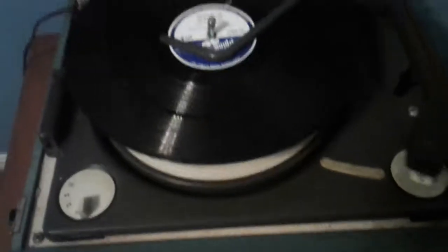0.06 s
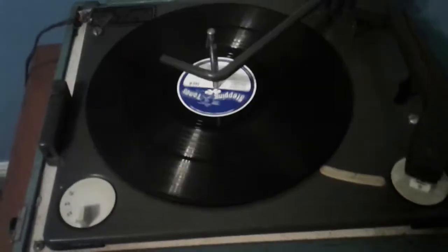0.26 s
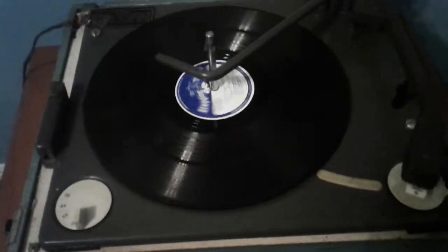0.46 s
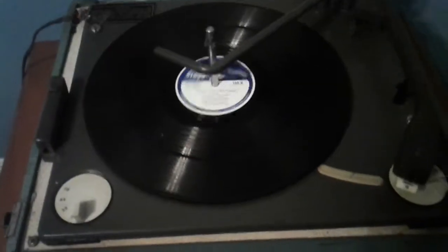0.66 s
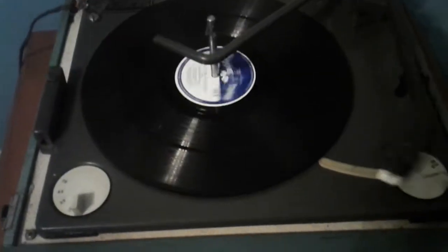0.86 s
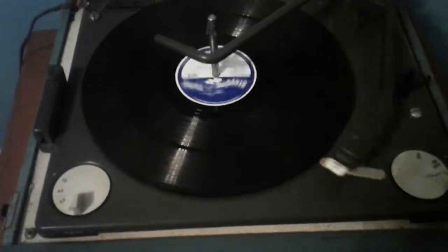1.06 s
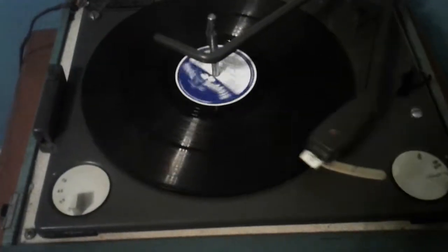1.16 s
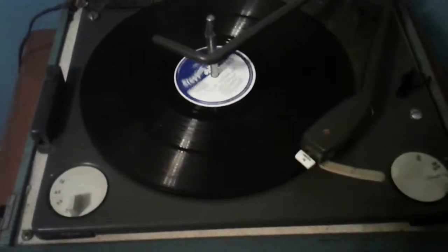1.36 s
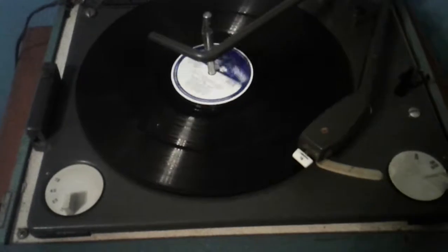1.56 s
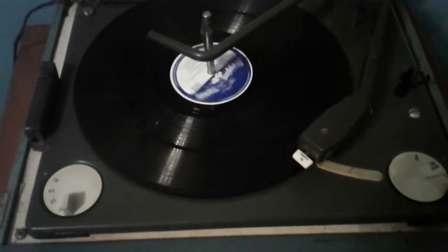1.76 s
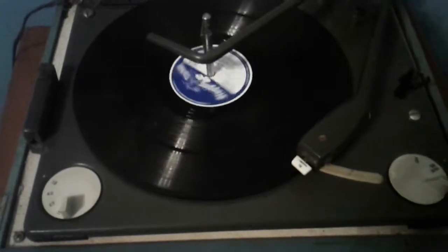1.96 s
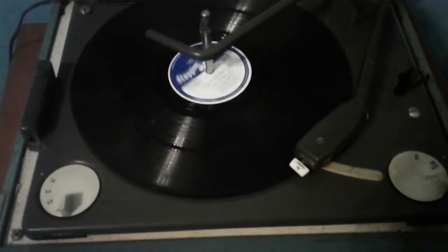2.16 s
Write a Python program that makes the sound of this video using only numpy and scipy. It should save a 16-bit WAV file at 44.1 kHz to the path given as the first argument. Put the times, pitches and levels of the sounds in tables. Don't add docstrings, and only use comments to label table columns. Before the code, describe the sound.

An old record changer drops a disc with a loud clack, then hums, ticks and clicks

```python
import sys
import numpy as np
from scipy import signal
from scipy.fft import rfft, irfft
from scipy.io import wavfile

SR = 44100
rng = np.random.default_rng(int(sys.argv[2]) if len(sys.argv) > 2 else 0)


def materialize(psi):
    bounded = np.clip(np.atleast_2d(psi).T, -1, 1)
    quanta = np.round(bounded * 32767).astype(np.int16)
    wavfile.write(sys.argv[1], SR, quanta)


def natural_amplitude(level_db):
    exponent = np.asarray(level_db, float) / 20
    return 10 ** exponent


N = 97020


def rms_one(x):
    return x / np.sqrt(np.mean(x ** 2) + 1e-20)


def noise():
    return rng.standard_normal(N)


def at_hz(points, hz):
    points = np.array(points, float)
    return np.interp(np.log(np.maximum(hz, 1)), np.log(points[:, 0]), points[:, 1])


def colour(x, spectrum):
    hz = np.arange(len(x) // 2 + 1) * SR / len(x)
    gain = natural_amplitude(at_hz(spectrum, hz)) * (hz > 0.7 * spectrum[0][0])
    return rms_one(irfft(rfft(x) * gain, len(x)))


def band(x, low_hz, high_hz):
    edges_hz = [low_hz, min(high_hz, 0.45 * SR)]
    return signal.sosfilt(signal.butter(2, edges_hz, "band", fs=SR, output="sos"), x)


def drift(rate_hz):
    r = np.exp(-2 * np.pi * rate_hz / SR)
    wander = signal.lfilter([1], [1, -2 * r, r * r], rng.standard_normal(N + SR))
    return rms_one(wander[SR:])


def since(start_s):
    return np.maximum(np.arange(N) / SR - start_s, 0)


def decay(seconds, t60_s):
    return natural_amplitude(-60 * seconds / t60_s)


def strike(times_s, levels_db, modes, tilt_db, spread_db, together_hz=0):
    out = np.zeros(N)
    luck_db = spread_db * rng.standard_normal((len(times_s), len(modes)))
    for k, (hz, mode_db, t60_s) in enumerate(modes):
        level_db = levels_db + mode_db + luck_db[:, k] + tilt_db * (hz > 1500)
        sign = (-1) ** (k * (hz > together_hz))
        clicks = np.full(N, 1e-18)
        clicks[(times_s * SR).astype(int)] = natural_amplitude(level_db) * sign
        r, w = decay(1 / SR, t60_s), 2 * np.pi * hz / SR
        out += signal.lfilter([0, np.sin(w)], [1, -2 * r * np.cos(w), r * r], clicks)
    return out


def air():
    # frequency_hz, level_db
    air_spectrum = [(88, -59), (150, -12), (230, -11.5), (861, -19), (1060, -20.5), (1600, -27),
                    (2490, -29.5), (3690, -36.5), (9000, -52), (11700, -65), (19800, -120)]
    return natural_amplitude(-63 + 0.7 * drift(21)) * colour(noise(), air_spectrum)


def room(x):
    # frequency_hz, t60_s
    reverb_times = [(200, 0.14), (1000, 0.25), (4000, 0.31), (12000, 0.33)]
    room_db, gap_s = -6.5, 0.0075
    late_db, late_longer, late_top_hz = -26, 3.95, 6000
    t = np.arange(SR) / SR
    white = rng.standard_normal((2, SR))
    tail = np.zeros(SR)
    for k, hz in enumerate(150 * 2 ** np.arange(0, 7, 0.5)):
        fall_db = -60 * t / at_hz(reverb_times, hz)
        late = natural_amplitude(late_db + fall_db / late_longer) * (hz < late_top_hz)
        echoes = band(white[k % 2], hz, np.sqrt(2) * hz)
        tail += echoes * (natural_amplitude(fall_db) + late) * (t > gap_s)
    return natural_amplitude(room_db) * signal.fftconvolve(x, tail / np.sqrt(np.sum(tail ** 2)))[:N]


def motor():
    # frequency_hz, level_db (rms)
    hum_lines = [(119.5, -54.5), (318, -72.5), (597, -89.5)]
    t = np.arange(N) / SR
    out = natural_amplitude(-61) * rms_one(band(noise(), 47.6, 95))
    for hz, db in hum_lines:
        out += np.sqrt(2) * natural_amplitude(db + 2.5 * drift(3.5)) * np.sin(2 * np.pi * hz * t)
    return out


def gear():
    # start_s, peak_db
    teeth = [(0.1407, -45), (0.508, -57.5), (0.5476, -58.5), (0.6746, -55.5), (0.8593, -50.5),
             (0.9542, -63), (0.9886, -63), (1.1135, -60.5), (1.1482, -62), (1.1936, -58), (1.2398, -56),
             (1.275, -59.5), (1.3186, -61), (1.3628, -58.5), (1.3956, -64), (1.482, -58.5), (1.559, -58.5),
             (1.6033, -62.5), (1.6368, -58), (1.7674, -48.5), (1.872, -61.5), (1.9122, -56.5),
             (2.0655, -56), (2.111, -50), (2.146, -48.5)]
    # frequency_hz, level_db, t60_s
    gear_modes = [(1082, -0.5, 0.05), (1255, 6.5, 0.005), (2235, -11, 0.034), (360, -4.5, 0.077)]
    rub_s = 0.0014
    times_s, levels_db = np.transpose(teeth)
    swell = np.zeros(N)
    for start_s in times_s:
        next_s = np.min(times_s[times_s > start_s], initial=N)
        u = since(start_s)
        swell += (u / rub_s).clip(0, 1) * (u < next_s - start_s)
    return swell * strike(times_s, levels_db + 4.5, gear_modes, 0, 1)


def grip():
    # time_s, level_db
    grip_levels = [(0.0, -53.5), (0.1, -43), (0.19, -58), (0.26, -38.5), (0.38, -48.5), (0.47, -48.5),
                   (0.73, -50), (0.88, -53.5), (1.08, -58), (1.4, -59.5), (1.54, -61.5), (2.2, -70)]
    times_s, levels_db = np.transpose(grip_levels)
    level_db = np.interp(np.arange(N) / SR, times_s, levels_db)
    return natural_amplitude(level_db + 1.5 * drift(7.2)) * rms_one(band(noise(), 40, 140))


def bumps():
    # start_s, peak_db, pitch_hz, fade_cycles
    hand_bumps = [(.068, -31.5, 118, 0.42), (0.11, -29, 128, 0.33), (0.25, -13.5, 86, 0.19),
                  (0.33, -28.5, 121, 0.74), (0.34, -36, 114, 0.51), (0.36, -41.5, 100, 1.2),
                  (.74, -42, 61, 0.7), (0.4688, -22.5, 181, 0.84), (0.63, -33.5, 560, 0.5),
                  (0.06, -37, 540, 0.45), (1.757, -40, 190, 0.26), (0.6255, -15, 92, 0.39),
                  (0.82, -31.5, 64, 0.43), (0.9, -35.5, 87, 0.73), (1.063, -41.5, 136, 2.4),
                  (1.2, -40.5, 113, 0.69), (1.271, -37, 105, 0.39), (1.354, -46, 134, .6),
                  (1.53, -39, 180, 0.25), (1.5031, -37, 223, 0.52)]
    glide_cycles, glide_span = 0.17, 0.31
    out = np.zeros(N)
    for start_s, db, hz, fade_cycles in hand_bumps:
        cycles = since(start_s) * hz
        swell = (cycles / fade_cycles * np.exp(1 - cycles / fade_cycles)) ** 2
        glide = glide_cycles * (1 - np.exp(-cycles / glide_span))
        out -= natural_amplitude(db) * swell * np.sin(2 * np.pi * (cycles + glide))
    return out


def taps():
    # start_s, level_db, top_hz, fade_s
    case_taps = [
        (0.0679, -37, 3000, 0.013),
        (0.1077, -44, 2510, 0.039),
        (0.466, -32, 510, 0.037),
        (0.624, -41.5, 1150, 0.068),
    ]
    white = noise()
    out = np.zeros(N)
    for start_s, db, top_hz, fade_s in case_taps:
        u = since(start_s)
        puff = white * (u > 0) * decay(u, fade_s)
        puff = band(band(puff, 230, top_hz), 18, top_hz)
        out += natural_amplitude(db) * np.sqrt(SR / 2 / top_hz) * puff
    return out


def snap():
    click = 1.0 * (np.arange(N) == int(1.5059 * SR))
    return natural_amplitude(-5) * band(band(click, 250, 1660), 46, 1660)


def latches():
    # start_s, peak_db, brightness_db
    knocks = [
        (.8975, -57.5, 10),
        (.9045, -62.5, 13.5),
        (1.7199, -43, -19),
        (1.7245, -43.5, -16),
        (1.7305, -50.5, -13),
        (2.151, -57, -22),
        (2.191, -48, -4),
    ]
    # frequency_hz, level_db, t60_s
    deck_modes = [(263, -14, 0.094), (410, -7, 0.038), (504, -1, 0.023), (598, -3, 0.16), (706, -2, 0.018),
                  (800, -4.5, 0.095), (1104, -3.5, 0.055), (2232, 2.5, 0.043), (3000, -10, 0.017)]
    times_s, levels_db, bright_db = np.transpose(knocks)
    return strike(times_s, levels_db, deck_modes, bright_db, 6.1)


def squeak(grit):
    u = np.clip(since(0.166) / 0.042, 0, 1)
    return natural_amplitude(-59) * np.sin(np.pi * u) * rms_one(band(grit, 6600 - 90, 6600 + 90))


def linkage():
    # start_s, level_db,
    # centre_hz, width_octaves, fade_s
    metal_moves = [(0.00077, -50.5, 1400, 3.43, 0.062), (0.016, -56, 4400, 1.85, 0.011),
                   (0.071, -51.5, 3900, 2.6, 0.0061), (0.107, -56.5, 3600, 1.7, 0.0096),
                   (0.12, -53.5, 1310, 1.9, 0.48), (0.12, -49, 423, .3, 0.51), (0.13, -50, 334, 0.25, 0.26),
                   (.001, -53, 420, 1, 0.11), (0.056, -57, 650, 0.55, 0.37), (.912, -61, 2070, 0.54, 0.045),
                   (.92, -56.5, 310, 0.21, 0.04), (.162, -39, 1110, 0.33, 0.032),
                   (.178, -42, 990, 0.2, 0.033), (0.12, -55, 5300, 1.9, .04),
                   (0.158, -48.5, 5000, 2.2, 0.034), (0.17, -52, 8000, 1.1, 0.014),
                   (0.9, -40.5, 322.7, 0.27, 0.019), (1.219, -50, 350, 0.44, 0.043),
                   (0.89, -63.5, 3950, 0.37, 0.0099), (0.53, -62, 1500, 3.1, 0.008),
                   (0.896, -58, 8350, 0.64, 0.014), (0.88, -49.5, 706, 0.86, 0.032),
                   (0.914, -63.5, 3020, 0.33, 0.024),
                   (1.497, -61, 1968, 1.38, 0.19), (1.51, -54, 350, 0.46, 0.14),
                 (1.899, -73, 4000, 1.27, 0.14), (1.717, -52, 6900, 3.7, 0.018),
                 (1.7208, -52.5, 2690, 1.5, 0.047), (1.7652, -42.5, 2130, 1.44, 0.019),
                 (1.764, -49, 4000, 0.22, 0.01), (1.774, -55, 2390, 0.83, 0.0067),
                 (1.725, -55, 800, .5, 0.025), (1.765, -52, 596, 1.2, 0.047),
                 (1.782, -53.5, 2010, 1.5, 0.073), (1.791, -61, 3700, 0.17, 0.028),
                 (1.99, -50, 2640, 1.1, 0.032), (1.99, -52.5, 1160, 1.24, 0.051),
                 (1.991, -51, 7900, 2.7, 0.086), (2.002, -46, 3000, 1.47, 0.025),
                 (2.0081, -46, 3170, 1.3, 0.012), (2.014, -42.5, 2920, 1.2, 0.011),
                 (2.028, -51.5, 2870, 1.26, 0.05), (2.109, -50.5, 1500, 2, 0.027),
                 (2.128, -52, 1480, 1, 0.096), (2.1271, -39, 3100, 0.92, 0.013),
                 (2.127, -57.5, 6840, 1.6, 0.038), (2.136, -41.5, 2760, 0.96, 0.017),
                 (2.146, -46.5, 2540, 1, 0.036), (2.147, -46, 377, 0.8, 0.12),
                 (2.16, -37.5, 2820, 1.83, 0.0074), (2.173, -42, 3140, 0.51, 0.008),
                 (2.11, -58, 3300, .6, 0.032), (2.1697, -38, 3200, 1, 0.0096),
                 (2.168, -43.5, 8500, 0.86, .015), (2.183, -47, 3000, 1.4, 0.017),
                 (2.181, -62, 8500, 1.2, 0.027), (2.196, -45, 4000, 2.7, 0.02)]
    grit = noise() * natural_amplitude(1.74 * drift(130))
    out = np.zeros(N)
    for start_s, db, hz, octaves, fade_s in metal_moves:
        i, spread = int(start_s * SR), 2 ** (max(octaves, 0.1) / 2)
        low_hz, high_hz = hz / spread, hz * spread
        burst = grit[i:i + SR // 4]
        burst = burst * decay(np.arange(len(burst)) / SR, 3 * fade_s)
        burst = band(band(burst, low_hz, high_hz), low_hz, high_hz)
        gain = natural_amplitude(db) * np.sqrt(SR / 2 / (min(high_hz, 0.45 * SR) - low_hz))
        out[i:i + len(burst)] += gain * burst
    out += squeak(grit)
    return signal.sosfilt(signal.butter(4, 10330, fs=SR, output="sos"), out)


def disc():
    # start_s, peak_db, brightness_db
    contacts = [
        (0.2114, -30.5, 13),
        (0.2141, -27, 0.5),
        (0.2199, -6.5, -2),
        (0.2219, -21.5, 2.5),
        (0.2255, -19, -29),
        (0.2301, -14, -8.5),
        (0.2394, -29.5, -6),
        (0.2482, -22.5, 3.5),
        (0.267, -39, 16.5),
        (.285, -37.5, 10),
    ]
    # frequency_hz, level_db, t60_s
    platter_modes = [(292, -3.5, 0.074), (342, -15, 0.057), (413, -3, 0.085), (398, 2.5, 0.076),
                     (514.4, 1.5, 0.1), (672, 3, 0.083), (778, -2, 0.062), (1068, -5.5, 0.097),
                     (1198, -8, 0.051), (1750, -10, 0.037), (2026, -4, 0.074), (2250, -8.5, 0.078),
                     (2525, -16, 0.06), (2820, -22, 0.03)]
    # frequency_hz, level_db (per Hz)
    slap_spectrum = [(150, -34.5), (400, 5), (1000, -11.5), (1400, -19.5), (2290, -13.5), (6900, -27),
                     (8600, -20), (15000, -58)]
    times_s, levels_db, bright_db = np.transpose(contacts)
    platter = strike(times_s, levels_db - 19, platter_modes, bright_db - 2, 2.8, together_hz=900)
    puffs = np.zeros(N)
    for start_s, db, bright in contacts:
        u = since(start_s)
        puffs += natural_amplitude(db + bright) * (u > 0) * decay(u, 0.039)
    return platter, natural_amplitude(-8.5) * puffs * colour(noise(), slap_spectrum)


def scene():
    ticks = gear() + latches()
    platter, slap = disc()
    bursts = linkage() + slap
    echoes = room(bursts + natural_amplitude(4.5) * platter + natural_amplitude(-13) * ticks)
    machine = motor() + ticks + platter + bursts
    handling = grip() + bumps() + taps() + snap()
    return (machine + echoes + handling + air())[None]


def low_pass(x):
    return signal.sosfilt(signal.butter(12, 15680, fs=SR, output="sos"), x)


def record(dry):
    hiss = natural_amplitude(-79) * rng.standard_normal(dry.shape)
    return low_pass(band(dry, 34.3, 11560) + hiss)


dry = scene()
out = record(dry)
materialize(out)
```